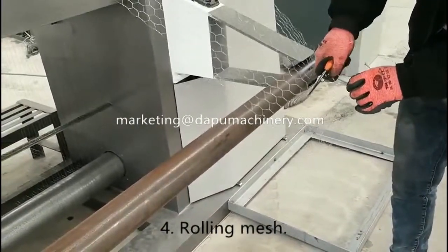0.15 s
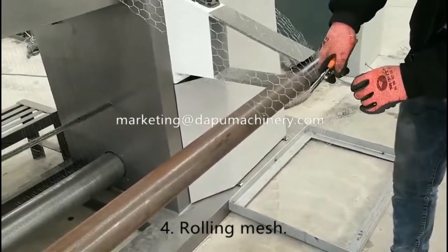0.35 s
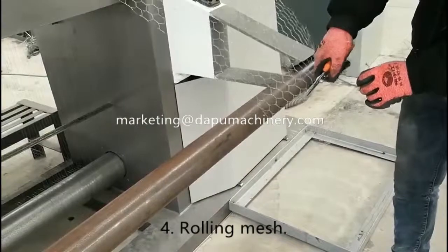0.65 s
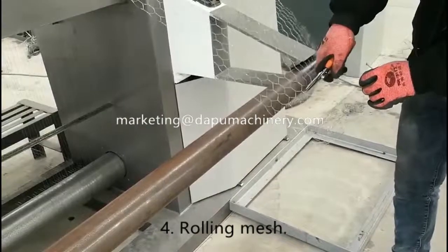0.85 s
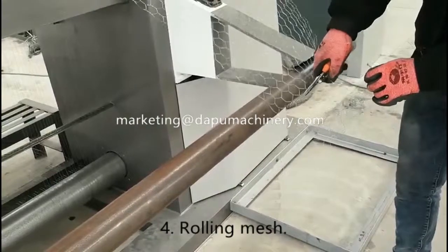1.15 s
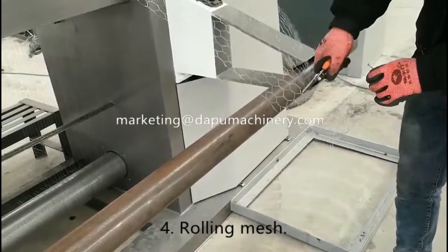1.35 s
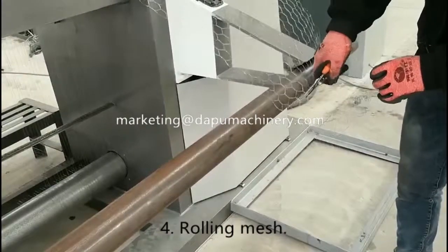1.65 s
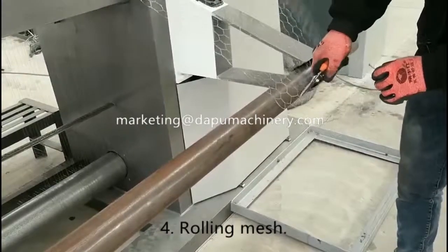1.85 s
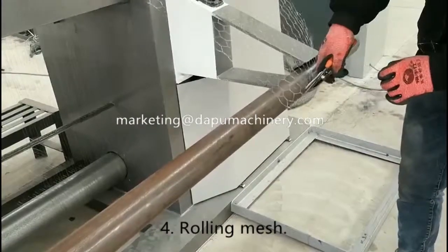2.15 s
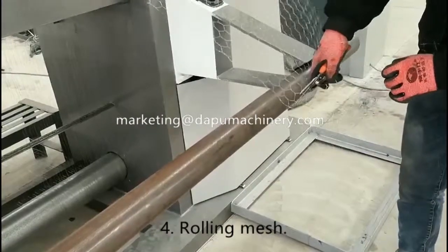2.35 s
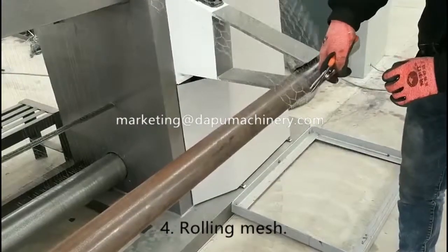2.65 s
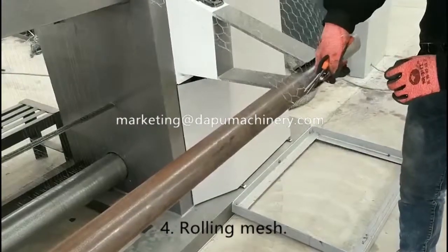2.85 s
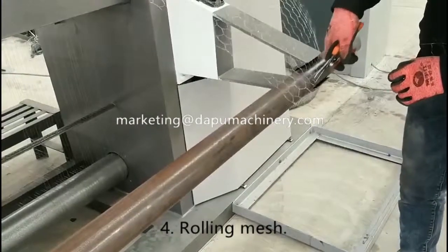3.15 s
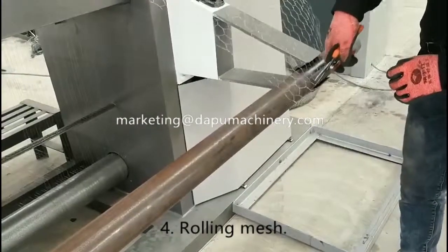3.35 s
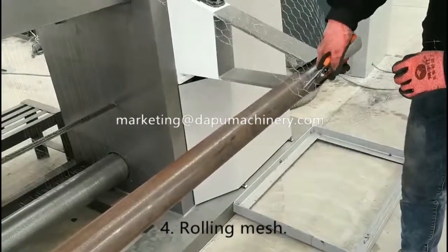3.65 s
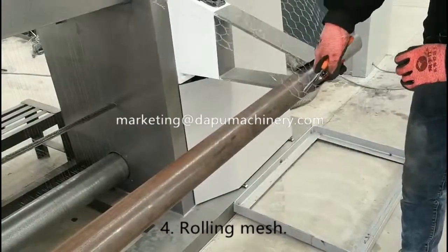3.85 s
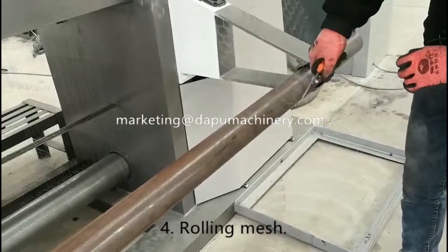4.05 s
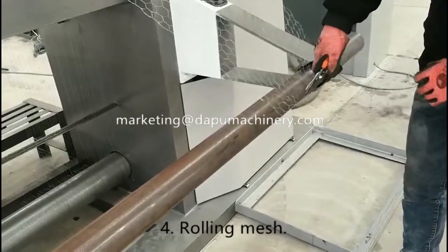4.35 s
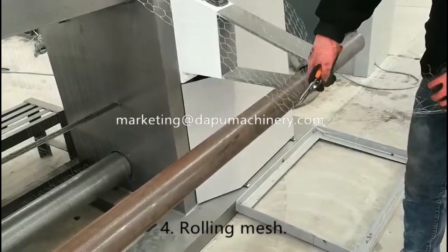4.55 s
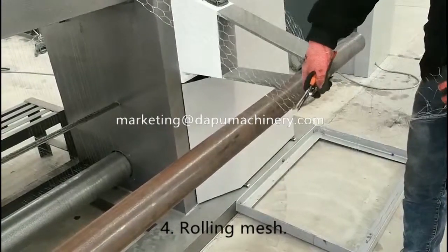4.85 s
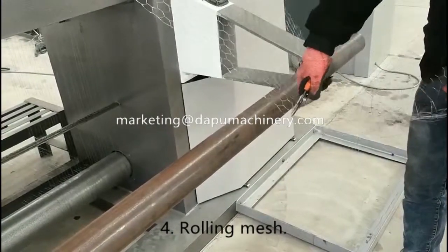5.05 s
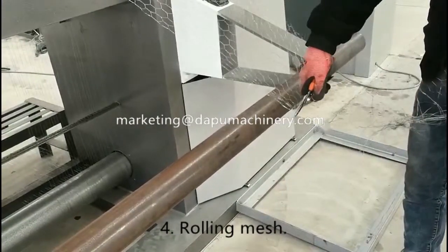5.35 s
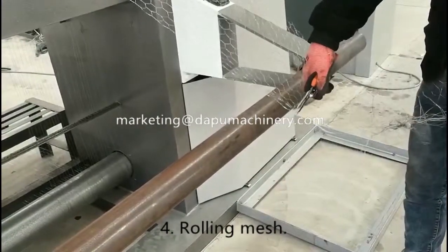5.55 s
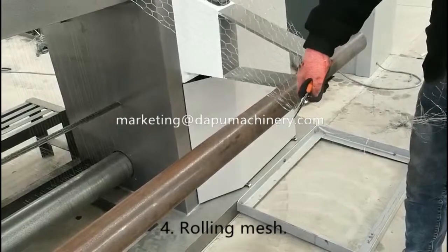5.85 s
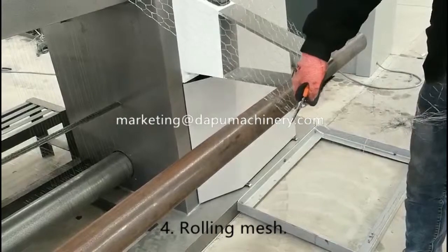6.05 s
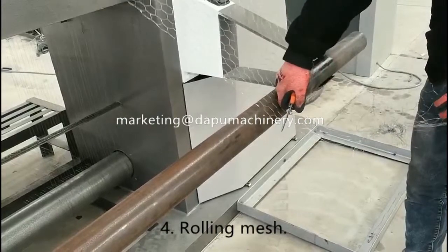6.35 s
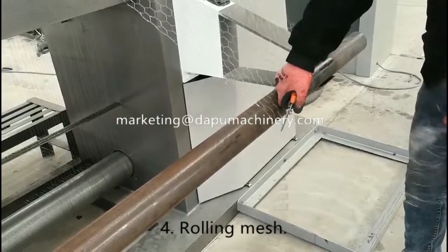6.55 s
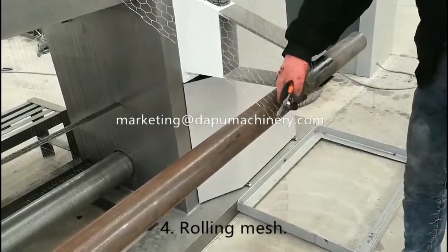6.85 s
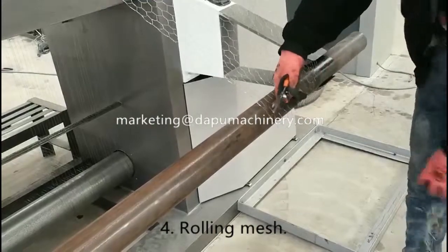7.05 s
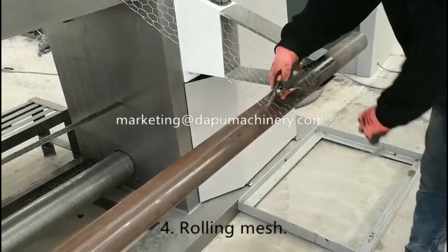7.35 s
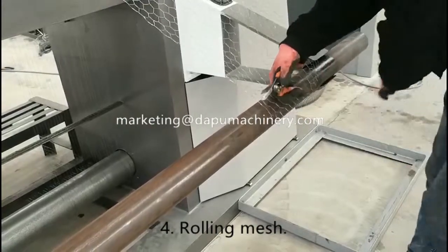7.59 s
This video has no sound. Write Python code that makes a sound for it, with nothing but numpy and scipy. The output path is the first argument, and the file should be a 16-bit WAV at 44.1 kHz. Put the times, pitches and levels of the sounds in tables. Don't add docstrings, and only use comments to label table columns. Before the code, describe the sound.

Close to a stereo microphone, pliers cut wire mesh in a large factory hall. Three sharp metallic snips come about half a second apart, then a pause with a soft knock, a quieter bite and clap, a heavy thud with another snip right behind it, light mesh rustling, one very loud final snip, and two sleeve swishes. Each strong hit rings briefly and echoes over a low, throbbing machine drone.

```python
import sys
import numpy as np
from scipy import signal
from scipy.fft import irfft
from scipy.io import wavfile
from scipy.ndimage import uniform_filter1d

SR = 44100
rng = np.random.default_rng(int(sys.argv[2]) if len(sys.argv) > 2 else 0)


def rack_gain(trim_db):
    fader = np.asarray(trim_db, float)
    return 10 ** (fader / 20)


def output_pcm(signal):
    pcm = np.clip(np.atleast_2d(signal).T, -1, 1) * 32767
    wavfile.write(sys.argv[1], SR, np.round(pcm).astype(np.int16))


N = 340535
LEAD = 8820

# t/s, low, middle and high ring level/dB
JAW_BLOWS = [(0.5586, -21.0, -23.0, -26.0), (0.5626, -26.0, -24.0, -26.0), (0.565, -21.0, -17.0, -19.0),
             (0.5664, -20.0, -31.0, -19.0), (0.5675, -28.0, -29.0, -31.0), (0.5696, -29.0, -18.0, -21.0),
             (1.0942, -18.0, -29.0, -22.0), (1.0975, -20.0, -22.0, -20.0), (1.0994, -14.0, -5.0, -16.0),
             (1.1016, -23.0, -22.0, -27.0), (1.1035, -22.0, -11.0, -21.0), (1.1055, -32.0, -24.0, -26.0),
             (1.1074, -31.0, -23.0, -36.0), (1.584, -29.0, -44.0, -60.0), (1.6247, -15.0, -12.0, -23.0),
             (1.6258, -16.0, -24.0, -36.0), (1.6288, -15.0, -4.0, -14.0), (1.6303, -20.0, -18.0, -17.0),
             (1.6321, -23.0, -29.0, -41.0), (1.6331, -25.0, -12.0, -24.0), (1.6358, -34.0, -12.0, -33.0),
             (1.6387, -27.0, -21.0, -30.0), (1.6421, -36.0, -21.0, -29.0), (3.8115, -45.0, -48.0, -52.0),
             (3.8149, -39.0, -39.0, -50.0), (3.8385, -38.0, -39.0, -38.0), (3.8418, -33.0, -32.0, -30.0),
             (3.8457, -34.0, -32.0, -27.0), (3.8481, -28.0, -46.0, -32.0), (3.85, -34.0, -34.0, -36.0),
             (3.8522, -30.0, -34.0, -35.0), (3.8549, -30.0, -35.0, -37.0), (3.891, -21.0, -32.0, -29.0),
             (3.892, -21.0, -34.0, -31.0), (3.8955, -65.0, -24.0, -27.0), (3.8966, -26.0, -23.0, -26.0),
             (3.8981, -26.0, -19.0, -21.0), (3.9021, -31.0, -22.0, -27.0), (4.9872, -17.0, -23.0, -29.0),
             (4.9906, -17.0, -27.0, -23.0), (4.9923, -17.0, -51.0, -23.0), (4.9946, -19.0, -25.0, -25.0),
             (4.9988, -21.0, -30.0, -37.0), (6.3386, -21.0, -17.0, -25.0), (6.34, -20.0, -25.0, -28.0),
             (6.3433, -14.0, -4.0, -15.0), (6.3449, -19.0, -29.0, -15.0), (6.3468, -20.0, -9.0, -20.0),
             (6.3493, -22.0, -16.0, -18.0), (6.3535, -26.0, -19.0, -25.0)]
# t/s, low ring f/Hz, middle ring f/Hz, its left-right level/dB
GRIPS = [
    (.565, 1930, 2980, -5),
    (1.099, 1900, 2760, -12),
    (1.585, 1910, 2700, -7),
    (1.629, 1920, 2700, -15),
    (3.846, 1650, 2680, -4),
    (3.897, 1700, 2750, -7),
    (4.991, 1740, 2720, -2),
    (6.344, 1980, 2830, -5),
]
RING_DB = (1.9, 2.4, 1)
RING_SWELL_S = (.0006, .0008, .0007)
PORT_LAGS = (3, 5, 3)
HIGH_RING_HZ = 3585
LOW_PAN_DB, HIGH_PAN_DB = 4.5, 1.5
JAWS_FROM_HZ = 1480
JAW_SCATTER_DB, CRACK_SCATTER_DB = -31, -29
# lag t/s, level/dB
FRAME_ECHOES = [(.013, -24), (.017, -35.5)]

# t/s, lower, upper and top ring level/dB
CRACKS = [(0.5583, -31, -39, -50.0), (0.562, -34.0, -39.0, -46.0), (0.5637, -35, -35, -47.0),
          (0.5654, -28, -32, -40.0), (0.5672, -30, -34.0, -48.0), (0.5693, -38, -38, -47.0),
          (0.5713, -42.0, -45, -49.0), (1.095, -28, -39.0, -45.0), (1.097, -24.5, -34.0, -30),
          (1.1001, -27.0, -25, -40.0), (1.1018, -33.0, -38.0, -42.0), (1.1037, -29.0, -33, -41.0),
          (1.1056, -36.0, -37.0, -47.0), (1.625, -34, -36, -46.0), (1.627, -33, -38.0, -43.0),
          (1.629, -26, -31, -28), (1.6304, -33.0, -35.0, -41.0), (1.633, -30.0, -26, -39.0),
          (1.6366, -39.0, -38.0, -45.0), (1.6386, -36, -42.0, -54.0), (1.641, -37, -43.0, -55.0),
          (3.814, -41.5, -52, -60), (3.818, -49.0, -47, -68.0), (3.8388, -55.0, -62.0, -75.0),
          (3.8405, -59.0, -62.0, -71.0), (3.8435, -44, -55.0, -65.0), (3.8469, -44, -50, -67.0),
          (3.8492, -48, -53.0, -64.0), (3.8514, -44, -50, -59.0), (3.8541, -48, -50, -64.0),
          (3.8568, -48, -53, -64.0), (3.892, -32, -40.0, -61.0), (3.8957, -25, -35, -47.0),
          (3.8982, -25, -33, -44.0), (3.8998, -33, -41, -49.0), (3.902, -38.0, -37, -48.0),
          (3.9046, -48, -48.0, -54.0), (4.9871, -33, -38, -48.0), (4.99, -25, -34.0, -44.0),
          (4.9925, -28, -27, -36.0), (4.9943, -28, -34.0, -46.0), (4.9958, -37, -37, -43.0),
          (4.9992, -40.0, -41.0, -55.0), (6.339, -34, -33, -42), (6.3415, -37, -37, -43),
          (6.3432, -11.5, -18, -34), (6.345, -28, -33, -48.0), (6.3475, -26, -23, -36.0),
          (6.3489, -28.0, -31.0, -42.0), (6.3521, -31.0, -35.0, -43.0)]
# f/Hz, width f/Hz
EDGE_RINGS = [(6900, 1650), (10100, 2700), (13300, 1800)]
# f/Hz, level/dB
STEEL = [(300, -40), (900, -32), (1400, -28), (2000, -14), (4000, 11), (5000, -6.5), (7000, -15),
         (8300, -20), (10000, -8), (13000, -29.5), (15000, -34), (16300, -63.5)]
# f/Hz, level/dB
EDGE_TREBLE = [(3000, -21), (4600, -6), (14200, -9.0), (15000, -9)]
# f/Hz, left-right level/dB
PORTS = [(60, -5), (110, -2), (200, -7), (380, 9), (700, 1), (1290, 0.5), (2380, -6), (4400, 7.5),
         (8120, 0), (15000, -6)]
EDGE_SHARPNESS, CRACK_T60 = 1.5, 0.014

# f/Hz, level/dB
DROP = [(71, -49), (120, -10), (230, 6), (400, -3), (600, -8.5), (1130, -5.5), (1280, -12.5), (1800, -9),
        (2050, -21), (2200, -11), (2500, -17.5), (3920, -37.5), (9000, -74), (11700, -76), (19800, -120)]
DROP_S, DROP_DB = 4.8348, -4
# level/dB, f/Hz, decay t60/s, rise t/s
BOOMS = [
    (-11, 86, 0.426, 0.059),
    (-15, 240, 0.059, 0.0012),
    (-11.5, 400, 0.031, 0.0012),
]
# t/s, level/dB, body f/Hz, decay
# t60/s (negative: growth)
REBOUND = (5, -46, 807.5, -1.5)
# t/s, peak level/dB, body f/Hz, decay t60/s
KNOCKS = [
    (2.068, -25.5, 240.3, 0.099),
    (2.085, -36.5, 391, 0.084),
    (2.13, -38.5, 402, .15),
    (5.754, -29, 210, 0.15),
    (6.423, -28, 221, 0.063),
    (6.897, -41, 378, 0.031),
]
PARTIALS = [(.68, 0.49), (1, 1), (1.5, 0.36), (2.05, 0.29), (3.1, 0.22), (3.9, 0.22)]

# t/s,
# peak level/dB, centre f/Hz, decay t60/s, left-right level/dB
TICKS = [(0.1294, -55, 7460, 0.082, -5), (0.3294, -59, 10700, 0.06, -3), (0.5094, -59, 4550, 0.06, 8),
         (1.04, -54, 5330, 0.097, 2), (1.445, -54.5, 5520, 0.066, -1), (1.556, -52, 7310, 0.06, 1),
         (2.038, -52, 4880, 0.081, 3), (2.0727, -45.5, 7500, 0.062, -7), (4.993, -16, 4680, 0.027, 8),
         (5.655, -59, 7500, .06, -2), (2.7194, -58, 4750, 0.06, -1.5), (4.84, -44, 7000, 0.06, -4),
         (4.749, -45, 7240, 0.06, -10), (5.358, -55, 6160, 0.06, -6), (5.4, -54, 6500, 0.06, -10),
         (6.6972, -59, 4920, 0.06, 0),
         (7.249, -49, 5500, .04, .1),
    (7.388, -45, 3500, .04, .1),
    (0.33, -58, 3700, .05, .1),
]
# start t/s, length t/s, highest after t/s, highest f/Hz, sag [Hz per s squared]
SQUEAKS = [
    (3.764, .088, .042, 9200, 300000),
    (3.905, .055, .025, 8700, -90000),
    (3.955, .125, .045, 9000, 125000),
]
SQUEAK_DB = -70

# strongest t/s, rise t/s, fall t/s, level/dB
SLIDES = [
    (2.08, 0.07, 0.056, -56),
    (4.835, 0.14, 0.066, -45),
    (4.938, 0.098, 0.04, -52),
    (5.39, 0.13, .09, -62),
    (5.5, 0.088, 0.15, -53.5),
    (5.752, 0.079, 0.039, -61),
    (2.43, .01, .03, -68),
    (6.704, 0.02, 0.1, -63),
    (7.715, 0.033, 0.07, -57.5),
]
SLEEVE = [
    (7.25, 0.11, 0.13, -47),
    (7.39, 0.13, 0.12, -44.5),
    (7.5, .1, 0.16, -63),
]
CREEPS = [
    (1.454, 0.023, 0.027, -50.5),
    (5.372, 0.042, 0.082, -52.5),
    (5.545, 0.17, 0.12, -49.5),
    (6.185, 0.022, 0.058, -51),
    (7.27, 0.24, 0.26, -53.5),
    (7.395, 0.03, 0.21, -49),
]
STROKE_DEPTH_DB = 24
# f/Hz, level/dB
WIRE = [(2650, 2), (4500, -10), (4760, 4.5), (5620, -6), (6670, 4.5), (10100, -7), (11000, -4.5),
        (14300, -20.5), (15500, -49)]
# f/Hz, level/dB
CLOTH = [(2600, -35), (3500, -13), (4700, -5.5), (5050, -5), (5500, 0), (5950, -6), (6300, -8), (7500, -8),
         (8400, -9), (9500, -5.5), (10300, -11), (11300, -18.5), (14900, -21), (15200, -45)]
# f/Hz, level/dB
MESH = [(1000, -31), (1500, -3.5), (2200, 0), (2900, -4), (3600, -12), (4300, -14.5), (6000, -36)]
# f/Hz, left-right level/dB
WIRE_SIDE = [(2000, 0), (3700, 3), (5500, -5), (13000, -5)]
# f/Hz, left-right level/dB
CLOTH_SIDE = [(2000, 0), (3700, 4), (10000, 4), (13000, -3)]

# f/Hz, level/dB
SNIP_AFAR = [(900, -28.5), (1500, -8.5), (1900, -2.5), (2380, -8), (2550, -1), (3700, -3.5), (4250, -12),
             (7000, -16.5), (11000, -22), (15000, -32), (16300, -58)]
# f/Hz, level/dB
DROP_AFAR = [(60, -3.5), (120, -3), (250, 2), (400, -1.5), (580, -10), (800, -3.5), (1000, -4.5),
             (1250, -12.5), (1650, -8), (2100, -11), (2600, -17), (3500, -30), (6000, -44), (12000, -61)]
SENT_DB = (-24.5, -15, -44, -13.5, -21, -27, -20.5, -10.5)
# t/s before the start, level/dB
EARLIER_SNIP = (0.12, -12.5)
# f/Hz, decay t60/s
HALL = [(100, 2.5), (300, 3.74), (800, 5.05), (2000, 2.2), (3500, 1.07), (7000, 1.05), (14000, 0.78)]
# lag t/s, level/dB
WALLS = [(.044, -16), (.061, -15.5), (.09, -15)]
# f/Hz, level/dB
NEAR_WALLS = [(300, 0.33), (1500, 0.47), (3000, 1.6), (9000, 9.93)]

# f/Hz, level/dB
DRONE = [(12, -44), (20, -9.5), (34, -10.5), (54, -9), (98, -13), (172, -24), (237, -26.5), (269, -26.5),
         (300, -29), (461, -32.5), (524, -34.5), (1290, -39), (1470, -39.5), (2030, -38), (2600, -44),
         (3400, -56), (4420, -71), (7480, -120)]
# f/Hz, correlation
DRONE_LIKENESS = [(60, 1.0), (120, 0.97), (240, 0.96), (480, -0.42), (950, 0.1), (1890, 0.027),
                  (3770, -0.53), (7520, -0.22), (15000, -1.4)]
# f/Hz, left-right level/dB
DRONE_SIDES = [(60, 0), (150, 0), (380, -1.5), (950, -2.5), (2380, 0), (5980, -3.5), (15000, 1)]
# t/s, level/dB
DRONE_SWELL = [(0, 1), (1, 1), (1.5, -0.5), (4.4, 0.5), (4.9, 1.5), (5.5, 2), (6, -0.4), (7.72, 0.06)]
# f/Hz, width f/Hz, level/dB
TONES = [
    (100.9, 6.07, -48.5),
    (204.2, 5.85, -60),
    (300.2, 5.72, -59),
    (2068, 30, -67),
    (5240, 4.2, -89.5),
    (10720, 20.4, -84.5),
]
# strongest t/s, half length t/s, level/dB
THROBS = [(.13, 0.11, -31), (0.386, 0.07, -30), (0.64, 0.19, -30.5), (0.92, 0.31, -29),
          (1.313, 0.18, -31.5), (2.171, 0.086, -29.5), (2.374, 0.053, -28), (2.56, 0.16, -28),
          (2.757, 0.099, -27.5), (2.901, 0.065, -26.5), (3.094, 0.15, -24.5), (3.414, 0.24, -29),
          (3.768, 0.12, -29), (4.058, 0.084, -33.5), (4.423, 0.61, -34.5), (4.68, 0.084, -32),
          (4.887, 0.11, -37), (5.055, 0.06, -28), (5.258, 0.099, -37), (5.505, 0.067, -27),
          (5.89, 0.064, -33), (6.268, 0.066, -30.5), (6.514, 0.17, -32.5), (6.781, 0.021, -26),
          (6.985, 0.082, -28.5), (7.453, 0.11, -32.5), (7.627, 0.096, -33)]
DRONE_DB, THROB_BEND = -44, 2.4
MOTOR_HZ, MOTOR_WAVER = 49.96, 0.0555
# f/Hz, level/dB
MIC_HISS = [(2000, -40), (3400, 3.5), (4400, 0), (5320, -0.5), (5970, -4), (8260, -8.5), (10600, -9.5),
            (11100, -11.5), (15900, -15.5)]
# f/Hz, correlation
MIC_HISS_LIKENESS = [(3500, -0.47), (6500, -0.38), (9000, -0.13)]
MIC_HISS_DB = -72.5
PAIR_HZ = 384
EDGE_HZ = 15600


def evened(x):
    return x / np.sqrt(np.mean(x ** 2) + 1e-20)


def read(points, hz):
    f, value = np.transpose(points)
    return np.interp(np.log(hz + 1), np.log(f + 1), value)


def add(mix, s, sound):
    part = mix[:, LEAD + round(s * SR):][:, :sound.shape[-1]]
    part += sound[..., :part.shape[1]]


def causal(db):
    log_gain = np.log(rack_gain(np.maximum(db, -100)))
    circle = np.concatenate([log_gain, log_gain[..., -2:0:-1]], -1)
    response = np.exp(np.conj(signal.hilbert(circle)))
    return irfft(response[..., :db.shape[-1]])


def bump(hz, centre_hz, width_hz):
    return -10 * np.log10(1 + (2 * (hz - centre_hz) / width_hz) ** 2)


def leaning(db):
    return np.multiply.outer([.5, -.5], db)


def panned(pan_db):
    return rack_gain(leaning([pan_db]))


def slow(rate_hz):
    t = np.arange(N) / SR
    rates = np.geomspace(.2, rate_hz, num=16)
    return evened(sum(np.sin(2 * np.pi * (f * t + rng.random())) / np.sqrt(f) for f in rates))


def patches(hz, t, size):
    field = rng.standard_normal((len(t), len(hz))).T
    field = uniform_filter1d(field, size=size, axis=0)
    return evened(uniform_filter1d(field, size=8, axis=1))


def hiss(field_db, same, size):
    hz = np.fft.rfftfreq(size, 1 / SR)[:, None]
    t = np.arange(4 * N // size + 5) * size / 4 / SR
    a, b, c, d = rng.standard_normal((len(t), len(hz), 4)).T
    likeness = np.clip(same(hz), -1, 1)
    left = a + 1j * b
    right = likeness * left + np.sqrt(1 - likeness ** 2) * (c + 1j * d)
    z = np.array([left, right]) * rack_gain(field_db(hz, t))
    return signal.istft(z, nperseg=size, noverlap=3 * size // 4)[1][:, :N]


def arched(strokes, bend):
    t = np.arange(N) / SR
    gain = 0
    for s, rise, fall, db in strokes:
        distance = np.maximum((s - t) / rise, (t - s) / fall)
        gain = gain + rack_gain(db - STROKE_DEPTH_DB * distance ** bend)
    return gain


def scattered(sound, spread_db):
    t = np.arange(1500) / SR
    envelope = rack_gain(spread_db - 60 * t / 0.06) * np.minimum(t / 0.0019, 1) ** 2
    paths = rng.standard_normal((2, len(t))) * envelope
    for lag, echo_db in FRAME_ECHOES:
        at = round(lag * SR) + rng.integers(0, 20, size=2)
        paths[[0, 1], at] += rack_gain(echo_db) * rng.choice([-1, 1], size=2)
    paths[:, 0] += 1
    return signal.fftconvolve(paths, sound, axes=1)


def snip(s, low_db, middle_db, high_db):
    t = np.arange(400) / SR
    _, low_hz, middle_hz, middle_pan_db = min(GRIPS, key=lambda grip: abs(grip[0] - s))
    levels_db = np.add((low_db, middle_db, high_db), RING_DB)
    rings_hz = (low_hz, middle_hz, HIGH_RING_HZ)
    pans_db = (LOW_PAN_DB, middle_pan_db, HIGH_PAN_DB)
    jaws = 0
    for db, f, pan_db, rise, lag in zip(levels_db, rings_hz, pans_db, RING_SWELL_S, PORT_LAGS):
        heard = np.maximum(t - np.array([[lag], [0]]) / SR, 0)
        envelope = (heard / rise * np.exp(1 - heard / rise)) ** 2
        jaws = jaws + rack_gain(db) * evened(panned(pan_db)) * envelope * np.sin(2 * np.pi * f * heard)
    jaws = signal.lfilter(*signal.butter(4, JAWS_FROM_HZ, "high", fs=SR), jaws)
    return s, scattered(jaws, spread_db=JAW_SCATTER_DB)


def edges():
    hz = np.fft.rfftfreq(512, 1 / SR)
    ports = 0.46 * read(STEEL, hz) + read(EDGE_TREBLE, hz) + leaning(read(PORTS, hz))
    return [causal(ports + EDGE_SHARPNESS * bump(hz, f, width)) for f, width in EDGE_RINGS]


def crack(rings, s, *levels_db):
    t = np.arange(300) / SR
    envelope = np.minimum(t / 0.00035, 1) * rack_gain(-60 * t / CRACK_T60)
    bursts = rng.standard_normal((len(rings), 2, len(t))) * envelope
    bursts[:, 1] += np.array([[-.6], [.3], [.1]]) * bursts[:, 0]
    fizz = 0
    for db, ring, burst in zip(levels_db, rings, bursts):
        part = signal.fftconvolve(ring, burst, axes=1)
        fizz = fizz + rack_gain(db) * part / np.sqrt((part[:, :60] ** 2).mean())
    return s, rack_gain(-3.0) * scattered(fizz, spread_db=CRACK_SCATTER_DB)


def drop():
    hz, t = np.fft.rfftfreq(4096, 1 / SR), np.arange(2600) / SR
    envelope = rack_gain(-17 - 60 * t / 0.11) * np.minimum(t / 0.0028, 1)
    paths = rng.standard_normal((2, len(t))) * envelope
    paths[[0, 1], [0, 24]] += [1.9, 1.3]
    push = causal(read(DROP, hz))
    return DROP_S, rack_gain(DROP_DB) * signal.fftconvolve(paths, push[None], axes=1) / abs(push).max()


def boom(db, hz, t60, rise):
    t = np.arange(SR) / SR
    return DROP_S, rack_gain(db - 60 * t / t60) * np.minimum(t / rise, 1) * np.sin(2 * np.pi * hz * t)


def knock(s, db, body_hz, t60):
    t = np.arange(4000) / SR
    ring = 0
    for ratio, share in PARTIALS:
        ring = ring + share * np.sin(2 * np.pi * ratio * body_hz * t) * rack_gain(-30 * ratio * t / t60)
    rustle = signal.lfilter(*signal.butter(2, 700, fs=SR), rng.standard_normal((2, len(t))))
    decay = rack_gain(-30 * t / t60)
    sound = (ring + 1.3 * rustle * decay) * decay * np.minimum(t / 0.0099, 1) ** 2
    return s, rack_gain(db + 3.5) * sound / abs(sound).max()


def tick(s, db, centre_hz, t60, pan_db):
    hz, t = np.fft.rfftfreq(512, 1 / SR), np.arange(1800) / SR
    scratch = rng.standard_normal((2, len(t))) * rack_gain(-60 * t / t60) * np.minimum(t / 0.0018, 1)
    wire = causal(0.4 * read(WIRE, hz) + 0.5 * bump(hz, centre_hz, 2300))
    sound = signal.fftconvolve(scratch, wire[None], axes=1)
    return s, rack_gain(db + 5.0) * panned(pan_db) * sound / abs(sound).max()


def squeak(s, length, top_s, top_hz, sag):
    t = np.arange(0, length, 1 / SR)
    tone = np.sin(2 * np.pi * np.cumsum(top_hz - sag * (t - top_s) ** 2) / SR)
    grip_db = 3 * np.sin(2 * np.pi * 47 * (s + t)) * np.sin(2 * np.pi * 19 * (s + t))
    return s, rack_gain(SQUEAK_DB + grip_db) * tone * signal.windows.tukey(len(t), .25)


def swish(strokes, colour, sides, patchy_db, bend, size=30):
    def field_db(hz, t):
        flicker_db = 0.89 * rng.standard_normal(len(t))
        grains_db = patchy_db * patches(hz, t, size)
        return read(colour, hz) + leaning(read(sides, hz)) + flicker_db + grains_db
    return arched(strokes, bend) * evened(hiss(field_db, lambda hz: 0.026 + 0 * hz, size=256))


def afar(s, db, colour, ring_hz=3000, focus=0):
    hz = np.fft.rfftfreq(4096, 1 / SR)
    ring_db = 20 * np.log10(1 + focus * rack_gain(2 * bump(hz, ring_hz, 920)))
    push = causal(read(colour, hz) + ring_db)
    return s, rack_gain(db) * push / abs(push).max()


def hall(x, size):
    taps = np.zeros((2, size))
    at = np.arange(700, size - 20, 20) + rng.integers(0, 20, (2, (size - 701) // 20))
    np.put_along_axis(taps, at, rng.choice([-1., 1.], at.shape), 1)
    taps[1] = 0.077 * taps[0] + 1.18 * taps[1]
    hz, t, z = signal.stft(taps, SR, nperseg=512)
    first = 1 + rack_gain(read(NEAR_WALLS, hz)[:, None]) * np.exp(-(t / 0.19) ** 4)
    decay = rack_gain(-60 * t / read(HALL, hz)[:, None])
    tail = signal.istft(z * first * decay, SR, nperseg=512)[1]
    tail *= np.clip(np.arange(tail.shape[1]) / SR / 0.062, 0, 1) ** 0.9
    tail /= np.linalg.norm(tail[0])
    for lag, db in WALLS:
        tail[[0, 1], round(lag * SR) + np.array([0, 9])] += rack_gain(db)
    return signal.fftconvolve(x.mean(0)[None], tail, axes=1)[:, :x.shape[1]]


def drone():
    def field_db(hz, t):
        return read(DRONE, hz) + 1.47 * patches(hz, t, 20) + leaning(read(DRONE_SIDES, hz))
    t = np.arange(N) / SR
    wash = hiss(field_db, lambda hz: read(DRONE_LIKENESS, hz), size=2048)
    band = signal.sosfilt(signal.butter(4, (120, 3000), "band", fs=SR, output="sos"), wash.mean(0))
    wash = wash * rack_gain(DRONE_DB + np.interp(t, *np.transpose(DRONE_SWELL))) / band.std()
    tones = 0
    for hz, width, db in TONES:
        level = rack_gain(db + 3.5 + 1.2 * slow(8.5))
        tones = tones + level * np.sin(2 * np.pi * np.cumsum(hz + width / 2 * slow(8)) / SR)
    shaft = np.sin(2 * np.pi * np.cumsum(MOTOR_HZ * (1 + MOTOR_WAVER * slow(5.2))) / SR)
    throbs = arched([(s, half, half, db) for s, half, db in THROBS], THROB_BEND)
    return wash + tones + throbs * shaft


def mic_hiss():
    noise = hiss(lambda hz, t: read(MIC_HISS, hz), lambda hz: read(MIC_HISS_LIKENESS, hz), size=512)
    return rack_gain(MIC_HISS_DB + 4.0) * evened(noise)


def scene():
    near, knocks, sent = np.zeros((3, 2, N + LEAD))
    rings = edges()
    for row in JAW_BLOWS:
        add(near, *snip(*row))
    for row in CRACKS:
        add(near, *crack(rings, *row))
    add(near, *drop())
    for row in BOOMS:
        add(near, *boom(*row))
    add(near, *knock(*REBOUND))
    for row in KNOCKS:
        add(knocks, *knock(*row))
    for row in TICKS:
        add(near, *tick(*row))
    for row in SQUEAKS:
        add(near, *squeak(*row))
    rubbing = swish(SLIDES, WIRE, WIRE_SIDE, patchy_db=2.5, bend=1.58)
    rubbing = rubbing + swish(SLEEVE, CLOTH, CLOTH_SIDE, patchy_db=1.4, bend=1.8, size=7)
    rubbing = rubbing + swish(CREEPS, MESH, CLOTH_SIDE, patchy_db=1.1, bend=1.3)

    add(sent, *afar(-EARLIER_SNIP[0], EARLIER_SNIP[1], SNIP_AFAR, 3070, focus=0.87))
    for (s, _, middle_hz, _), hall_db in zip(GRIPS, SENT_DB):
        add(sent, *afar(s, hall_db, SNIP_AFAR, 1.096 * middle_hz, focus=0.75))
    add(sent, *afar(DROP_S, 2.76, DROP_AFAR))
    far = hall(sent + rack_gain(-8.0) * knocks, size=2 * SR)

    left, right = (near + knocks + far)[:, LEAD:]
    side = signal.lfilter(*signal.butter(2, PAIR_HZ, "high", fs=SR), left - right)
    events = (left + right + np.array([[1], [-1]]) * side) / 2
    return events + rubbing + drone() + mic_hiss()


def top_cut(x):
    return signal.sosfilt(signal.butter(12, 16430, fs=SR, output="sos"), x)


def record(dry):
    peak_db = 10 * np.log10(uniform_filter1d((dry ** 2).mean(0), size=200) + 1e-12)
    fall = np.arange(N) * 60.0 / SR
    over_db = np.maximum(np.maximum.accumulate(peak_db + fall) - fall + 26, 0)
    late = np.roll(uniform_filter1d(over_db, size=600), 500)
    held = np.tanh(dry / rack_gain(0.27 * late) / 1.169) * 1.104
    low_pass = signal.firwin(191, EDGE_HZ, fs=SR)
    limited = signal.oaconvolve(np.clip(held, -.93, .93), low_pass[None], "same")
    return top_cut(limited)


dry = scene()
out = record(dry)
output_pcm(out)
```